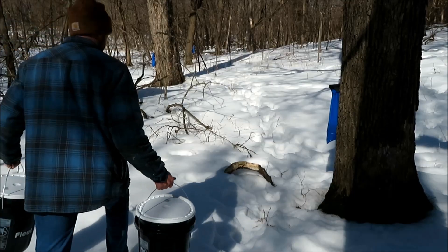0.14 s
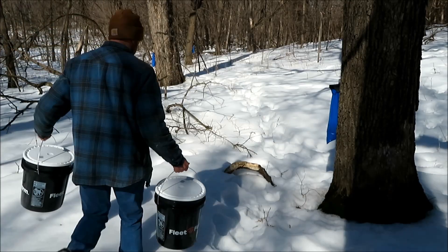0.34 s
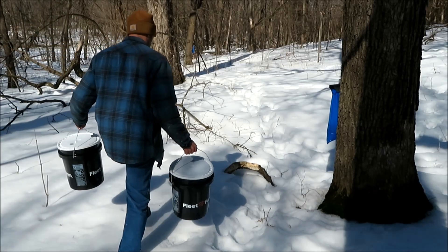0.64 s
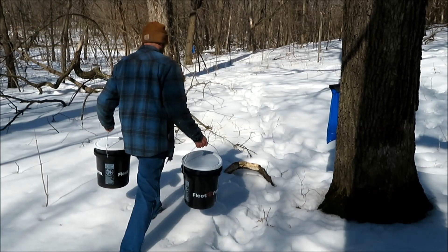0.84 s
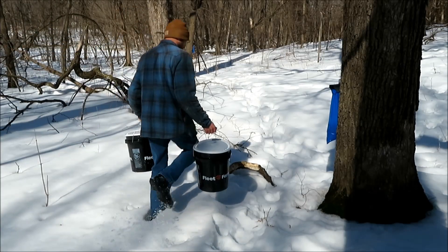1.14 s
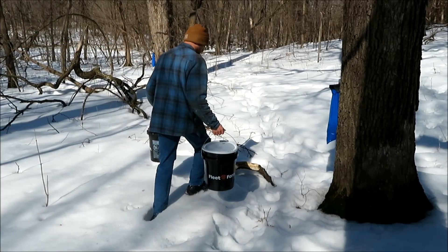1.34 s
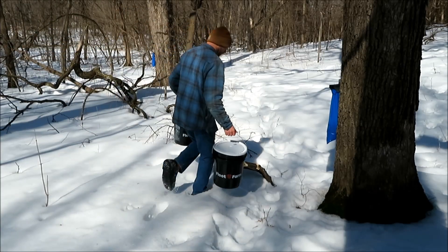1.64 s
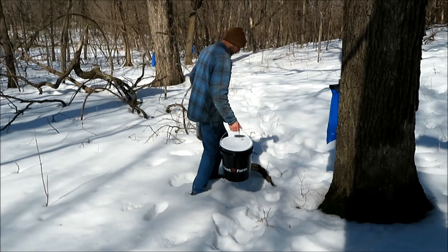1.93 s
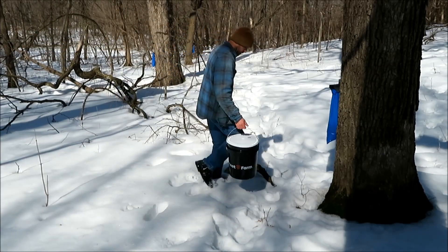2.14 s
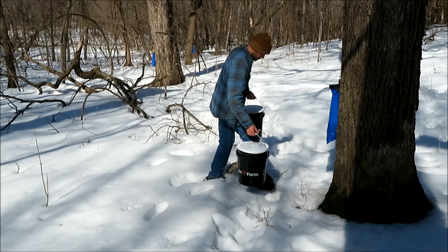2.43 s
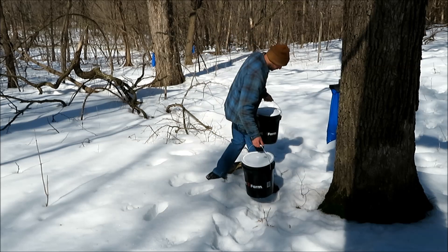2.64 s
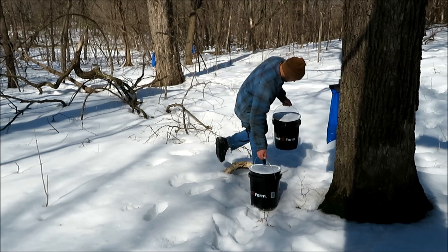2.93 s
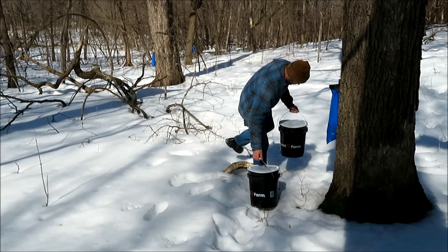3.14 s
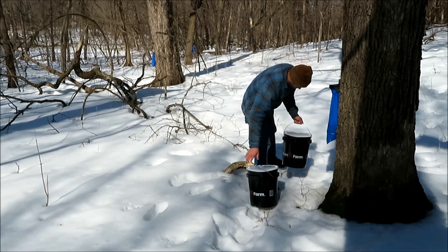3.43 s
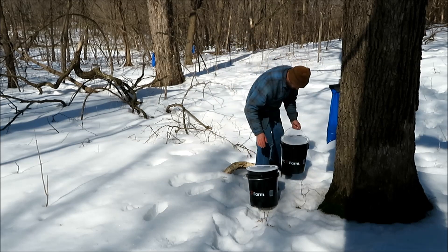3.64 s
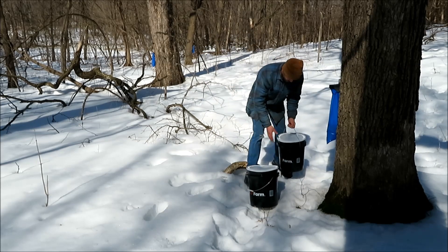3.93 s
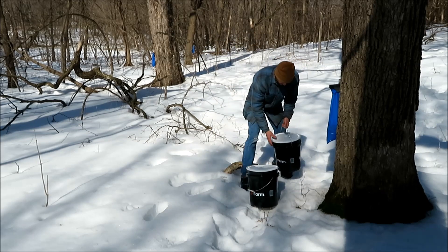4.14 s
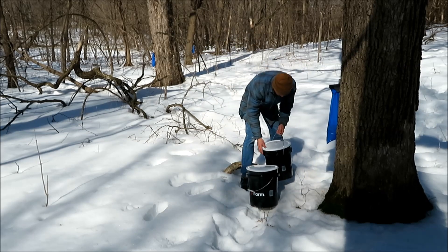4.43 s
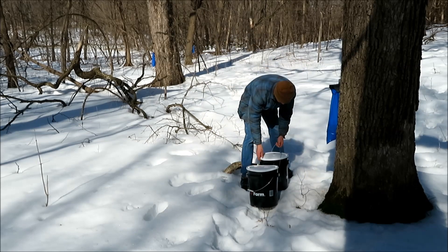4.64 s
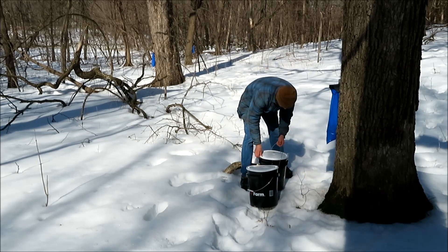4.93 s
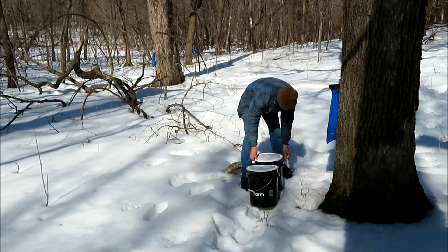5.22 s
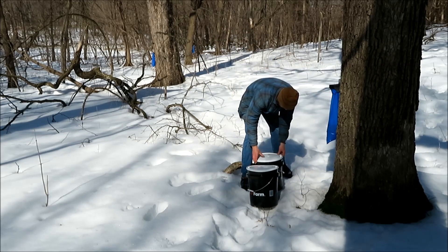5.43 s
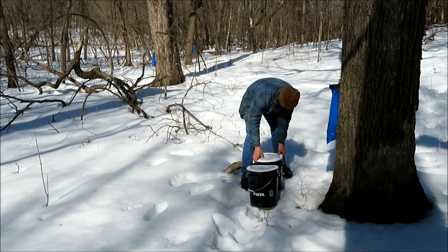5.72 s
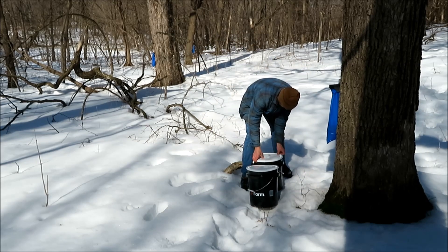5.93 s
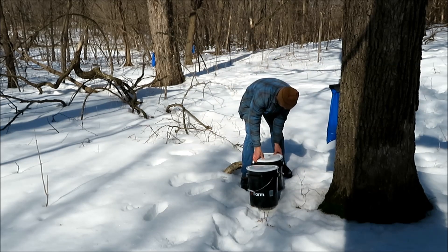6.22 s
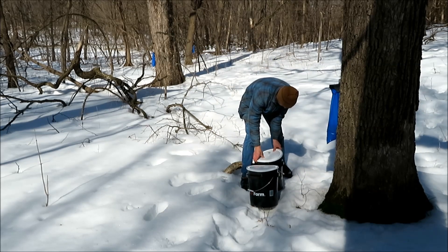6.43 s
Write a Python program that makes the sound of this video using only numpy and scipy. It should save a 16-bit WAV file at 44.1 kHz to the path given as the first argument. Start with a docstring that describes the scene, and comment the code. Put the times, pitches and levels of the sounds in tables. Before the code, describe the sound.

A fixed stereo microphone in open, snowy woods hears a low, unsteady engine idling far off, with faint rustle and hiss throughout. Boots crunch through crusted snow at about 0.1, 0.8, 1.4, 1.9 and 2.5 seconds, the first ones loud and gritty, the last quieter and duller as the walker moves off. Near 3.0 a plastic pail lands with a rough scrape and hollow thud, followed by small rattles until 3.6. At 3.8 comes a sharp handle clack with a snap, then another knock at 4.0 and light rubbing. After a lull, a duller bump and scuff at 4.7 lead to a cluster of quick rattles around 5.1-5.2, and stronger knocks at 5.4 and 5.6. Soft thuds at 5.9 fade into near quiet with small taps. At 6.37 a very loud, dry, bright lid snap bursts out, with a brief plastic rub ending the scene around 6.5.

```python
"""Boots and pails in winter woods

Boots walk away over crusted snow: grains of noise break under each step and their treble narrows.
Two plastic pails are set down; handles and lids rub and knock as noise ringing through wall resonances.
Decaying sines add thuds, clean rings, hard clicks and two snaps of a lid rim.
Far off an idling engine, shaft orders in noise, swells and fades; rustle and hiss lie under it all."""
import sys
import numpy as np
from scipy import signal
from scipy.fft import rfft, irfft, next_fast_len
from scipy.io import wavfile
from scipy.ndimage import uniform_filter1d, map_coordinates

SR = 44100
rng = np.random.default_rng(int(sys.argv[2]) if len(sys.argv) > 2 else 0)


def to_wav(sig):
    """Store sig (one row per channel, or 1-D mono) as 16-bit WAV at the path in sys.argv[1].

    Samples outside -1..1 are clipped; the rate is SR.
    """
    pcm = np.clip(np.atleast_2d(sig), -1, 1) * 32767
    pcm = np.round(pcm).astype(np.int16)
    wavfile.write(sys.argv[1], SR, pcm.T)  # frames by channels


N = 289296

# Boot load on the crust, heel to sole to toe, one list a step: start_s, level_db, dull_db, edge_db
STEP_LOADS = [
    [(.135, -39, 7, -4), (.141, -27.5, -5, -6), (.18, -34, 7.5, -3), (.2, -37, -2, -4), (.225, -49, -9, -2),
     (.236, -38.5, 8, -0.5), (.27, -35.5, 0.5, -1), (.34, -37, 4, -2.5), (.39, -41.5, -4, -3.5),
     (.422, -36.5, 4.5, -9.5), (.445, -47, 5, -4)],
    [(.804, -35, 12, -15), (.807, -29, 8, -8.5), (.83, -37, 6, -0.5), (.885, -43.5, 1, -0.5),
     (.92, -41, 4, -4.5), (.935, -35.5, -2, -5), (.985, -40, -9, -1), (1.005, -40.5, 4, -2),
     (1.025, -38.5, 3, 2), (1.06, -36.5, -3, -3.5), (1.087, -46, 2, -2)],
    [(1.384, -47, -4, 1), (1.394, -29.5, 0, -9.5), (1.425, -29.5, -5, -5), (1.445, -46.5, 2, -3),
     (1.464, -52, 0, -2), (1.47, -48, 7, 3), (1.52, -41, 3, -0.5), (1.575, -38.5, 5.5, -1.5),
     (1.625, -46, -5, -6.5), (1.67, -40, 10.5, -5), (1.695, -51, 12, -1)],
    [(1.94, -45, 8, 0), (1.947, -36.5, 2, -2), (1.975, -37, 9, 1.5), (2.003, -46, -3, 2),
     (2.08, -46, -4, -2), (2.165, -46, 7, -3.5), (2.205, -44, 3, 2), (2.245, -47, 0, -3.5),
     (2.26, -55, 16, 0)],
    [(2.534, -54, 0, -1), (2.54, -35.5, -8, -7.5), (2.562, -49.5, -10, 1.5), (2.59, -42, 4.5, -6.5),
     (2.688, -49.5, -2, -10), (2.705, -64, 5, -8)],
]
# Icy part of each step over its edge part: icy_db
STEP_ICY_DB = [1.3, 0.28, -1.6, -2.3, -2]
# Swinging boot grazes the crust: start_s, length_s, level_db, dull_db, icy_db
GRAZES = [(1.306, 0.029, -49.5, 6, -3), (2.375, 0.057, -47.5, -4, -14)]
# Snow noise spectrum: freq_hz, density_db_per_hz
SNOW_SPECTRUM = [(240, -21), (400, 1.5), (453, 7.5), (949, -3.5), (1130, -6), (1350, -8.5), (1560, -20.5),
                 (1840, -14.5), (2250, -18), (3470, -19.5), (4950, -26), (6050, -21), (13100, -21.5),
                 (16000, -20)]
# Left-right likeness of near snow: freq_hz, likeness
NEAR_LIKENESS = [(300, 1), (1400, 0.98), (3000, 1), (7000, 0.65), (15000, 0.81)]
# Pail rubs, one stroke a row: start_s, level_db, rise_s, hold_s, t60_s, dull_db, icy_db, ring_hz
SCUFFS = [(2.981, -18.5, 0.013, 0.0034, 0.072, -12, -12, 1330),
          (3.032, -43.5, 0.0076, 0.038, 0.62, -3, -17, 1350),
          (3.197, -43.5, 0.02, 0.0036, 0.42, 2, -16, 1350),
          (3.261, -39, 0.016, 0.048, 0.18, 3, -15.5, 1330),
          (3.385, -50, 0.016, 0.017, 0.091, -4, -17, 1350), (3.551, -57, 0.033, 0.033, 1.2, 11, -6, 1750),
          (3.736, -61, .06, 0.026, 0.34, 15, -2, 1700), (3.864, -44, 0.029, 0.018, 0.15, -7, -19, 1300),
          (3.956, -47, 0.013, 0.0024, 0.74, 3, -8, 1270), (4.047, -44, 0.021, 0.0056, 0.13, -9, -25, 1300),
          (4.101, -47.5, 0.026, 0.042, 0.43, 6, -16, 1320),
          (4.742, -31.5, 0.015, 0.021, 0.18, 1, -16.5, 1400),
          (4.825, -55, 0.025, 0.094, 0.53, 5, -24, 1450), (4.927, -49, 0.02, 0.022, 0.11, -9, -10, 1530),
          (5.102, -35, 0.0048, 0.021, 0.13, 1.5, -10.5, 1600),
          (5.147, -34, 0.024, 0.022, 0.15, -1, -17.5, 1280),
          (5.215, -39.5, 0.02, 0.017, 0.077, 7, -22, 980), (5.267, -51, 0.026, .06, 0.24, 2.5, -15, 1430),
          (5.385, -53, 0.041, .004, 0.12, -9, -13, 1450), (5.442, -47, 0.0049, 0.076, 0.13, 7.5, -17, 1600),
          (5.608, -46, 0.0042, 0.026, 0.41, -1, -19, 1340),
          (5.72, -61, 0.017, 0.0028, 1.02, -10, -29, 1268),
          (6.377, -34, 0.0039, 0.0075, 0.091, -1, -27, 3020),
          (6.398, -37.5, 0.0045, 0.019, 0.14, -12, -30, 1970),
          (6.441, -48.5, 0.015, 0.038, 0.28, -24, -32, 2050),
          (6.495, -52.5, 0.012, 0.047, .08, -23, -32, 2380)]
# Pail, handle and lid contacts: start_s, level_db, dull_db, bright_db, ring_hz, hold_s, nominal_t60_s
KNOCKS = [(2.989, -23.5, 3, -5.5, 2230, 0.011, 0.13), (3.023, -33, 3, -9, 1260, 0.0045, 0.076),
          (3.047, -40, -5, -14, 1330, .004, 0.056), (3.081, -42.5, 10.5, -4, 1400, 0.0093, 0.044),
          (3.128, -38.5, 1, -5.5, 1090, 0.0044, 0.08), (3.194, -43, 6, -6, 1420, 0.0031, .04),
          (3.208, -39, -14, -13, 1440, 0.0027, .04), (3.228, -38, -19, -18, 1160, 0.004, .032),
          (3.273, -40, -7, -7, 1210, .004, 0.057), (3.386, -42, 6, -6, 1208, .002, .02),
          (3.392, -36, 0, -2.5, 1220, 0.003, 0.071), (3.524, -50, -17, -12, 1280, 0.0049, 0.065),
          (3.6, -47.5, -6, -7, 750, 0.0049, 0.046), (3.738, -43.5, -5.5, -7, 1930, 0.0044, 0.16),
          (3.76, -46, -8, -9, 1210, 0.011, 0.1), (3.826, -21.5, 0, -9.5, 2330, 0.0046, 0.045),
          (3.829, -24.5, 2.5, -10, 1350, 0.014, 0.14), (3.894, -40.5, -4, -10, 1150, 0.011, 0.051),
          (3.96, -49, 3, -11, 1000, .004, 0.037), (4.0317, -28.5, -8, -9.5, 1370, 0.0065, 0.03),
          (4.039, -40, 6.5, -10, 1320, 0.0068, 0.14), (4.093, -46, 0, -2, 3180, .002, 0.023),
          (4.1013, -35, -9, -7, 1310, 0.0039, 0.1), (4.175, -47.5, 4, -5.5, 2370, 0.0086, 0.059),
          (4.723, -26.5, -3.5, -5, 1650, 0.019, 0.062), (4.959, -46, -20, -2, 1610, 0.005, 0.05),
          (4.995, -49, 4, -4.5, 1130, 0.0026, 0.018), (5.08, -65, 8, -18, 750, 0.0033, 0.049),
          (5.1105, -29.5, -4, -11, 1540, 0.0022, 0.036), (5.114, -32, -1, -13, 1500, .003, 0.06),
          (5.133, -31.5, -1.5, -18, 2300, 0.0044, 0.044), (5.1753, -30, -8, -9, 1230, .003, 0.033),
          (5.187, -29, -9, -14, 1510, 0.0022, 0.048), (5.195, -33, -4, -19, 1700, 0.0018, 0.036),
          (5.245, -41, 6, -16, 2300, 0.0039, .03), (5.164, -36, -7, -12, 1280, 0.0033, 0.044),
          (5.201, -33, -2, -23, 1280, 0.0033, 0.034), (5.268, -40.5, 3, -8, 4300, 0.0038, 0.066),
          (5.329, -54, 3, -18, 1020, .003, .04), (5.347, -42, 4, -7, 1260, 0.0042, 0.091),
          (5.42, -23, 2, -11, 1120, 0.0054, 0.13), (5.476, -37, -4, -8.5, 1210, 0.0038, 0.04),
          (5.495, -41, -6, -10, 1210, .0086, 0.082), (5.504, -44, -5, -20, 1580, .006, .08),
          (5.571, -35, -2, -13, 3820, 0.01, 0.052), (5.5842, -24.5, -3.5, -6.5, 1380, 0.0022, 0.12),
          (5.648, -39.5, -9, -14.5, 1290, 0.012, 0.15), (5.76, -48.5, 5, -15, 896, 0.0033, 0.036),
          (5.815, -57, 11, -12, 907, .004, .05), (5.827, -60, 6, -14, 1580, .008, .06),
          (6.136, -45, 2.5, -7, 1280, 0.013, 0.14), (6.244, -44.5, -7, -8.5, 900, 0.0031, 0.048),
          (6.3689, -13, -12.5, -8, 2940, 0.0013, 0.04), (6.43, -47, -12, -6, 2250, 0.0074, 0.13)]
# Pail wall resonances: freq_hz, width_hz, level_db
PAIL_MODES = [(263, 220, -4.5), (525, 100, 5.5), (794, 180, -1), (933, 33, 9), (1220, 140, 5),
              (1665, 135, 7.5), (1906, 76, 5.5), (2236, 97, 8), (2377, 280, -1.5), (2724, 38, 3.5),
              (3460, 72, -14), (3674, 19, 7), (3960, 56, -7), (4840, 330, 2), (5230, 320, -8)]
# Left-right likeness of the pails: freq_hz, likeness
PAIL_LIKENESS = [(300, 1), (700, 0.98), (1300, .96), (2400, 0.98), (4400, 0.82), (8000, 0.88),
                 (15000, 0.68)]
# Weight landing on the snow: start_s, level_db, pitch_hz
THUDS = [(0.233, -16, 83), (0.806, 2, 690), (.806, -1, 360), (0.808, -18, 88.5), (0.82, -7, 520),
         (1.278, -13, 454), (1.979, -8.5, 145), (3.002, -5.5, 117), (3.126, -13, 104), (4.735, -6.5, 106.6),
         (4.773, -8.5, 101), (4.873, -12.5, 132), (5.065, -13, 400), (5.126, -12, 98), (5.246, -13.5, 90),
         (5.861, -3.5, 124), (5.885, -11.5, 108)]
# Single pail tones left ringing by a blow: start_s, level_db, pitch_hz, t60_s
RINGS = [(3.01, -13.5, 474, 0.15), (3.052, -33, 1340, .06), (3.081, -29, 1390, .05),
         (3.134, -37, 1060, 0.045), (3.197, -35, 1440, .05), (3.208, -32, 1430, .05),
         (3.226, -31, 1430, .06), (3.288, -29, 1230, 0.23), (3.395, -30, 1240, 0.046),
         (3.8262, -21, 12500, 0.0072), (3.3, -28.5, 583, 0.31), (3.527, -41, 1980, 0.045),
         (3.75, -40, 1990, 0.1), (3.835, -15, 732, 0.056), (4.036, -31.5, 1268, 0.32),
         (3.868, -31, 2240, .04), (4.126, -43, 3500, .04), (4.127, -36, 2300, .04),
         (4.147, -38, 2260, 0.053), (4.1043, -24.5, 2320, .03), (4.18, -35, 2300, 0.041),
         (5.433, -21, 231, 0.21), (4.735, -19, 1180, 0.041), (5.12, -36, 1770, 0.1), (5.17, -28, 1270, .1),
         (5.424, -24, 2220, 0.042), (5.445, -45, 2710, 0.3), (5.587, -34, 3980, 0.077),
         (5.651, -32, 1282, 0.094), (6.424, -25, 2250, 0.038), (6.4, -31, 1900, .03),
         (6.412, -38, 1740, .03), (3.332, -40, 2670, 0.057)]
# Lid rim springs: start_s, level_db
SNAPS = [(3.8269, -10), (6.37, 2)]
# Lid tones in each snap: pitch_hz, relative_db, t60_s
LID_MODES = [(313, 0, 0.0088), (520, -12, 0.019), (1157, -11.5, 0.023), (1617, -17, 0.04),
             (2260, -12, 0.028), (2940, -7, 0.0058), (3600, -6.5, 0.0043), (4110, 4, 0.0044),
             (4480, -11, 0.011)]
# Hard edge touches first: start_s, level_db
CLICKS = [(3.1895, -40), (3.207, -35), (3.2325, -36), (3.267, -39), (3.393, -37), (3.8262, -19),
          (3.9575, -38), (3.9925, -36), (4.0329, -19), (4.103, -28), (5.269, -35), (5.4224, -24.5),
          (5.4715, -36), (5.574, -32), (5.5856, -18.5), (6.3697, -11)]
# Edge tones in each click, before scatter: pitch_hz, relative_db, t60_s
EDGE_MODES = [(3070, -1.5, 0.012), (4400, -3.5, 0.013), (6300, -20, 0.0069), (8400, -29, 0.0037),
              (10400, -9.5, .005)]
# Engine noise levels: time_s, rumble_db, drone_db
ENGINE_LEVELS = [(0.0, -34.5, -44.5), (0.47, -35.5, -35.5), (1.33, -35, -37.5), (2.26, -33, -34.5),
                 (3.36, -34, -38), (4.29, -36.5, -40), (5.19, -35.5, -38), (6.56, -34.5, -45.5)]
# Shaft orders, before flutter and fade: multiple, rms_db
SHAFT_ORDERS = [(2, -57.5), (9, -40.5), (11, -43.5), (18, -52.5), (27, -57)]
# Low engine noise spectrum: freq_hz, density_db_per_hz
RUMBLE_SPECTRUM = [(12, -42), (20, -9), (108, -2.5), (124, -0.5), (155, 0.5), (174, 1.5), (231, -5),
                   (253, -7.5), (300, -28), (390, -9), (660, -120)]
# Upper engine noise spectrum: freq_hz, density_db_per_hz
DRONE_SPECTRUM = [(140, -34), (230, -14.5), (305, 6.5), (392, -4.5), (455, 0.5), (560, -10), (638, -38),
                  (782, -36), (1500, -26), (1950, -37), (3300, -120)]
# Narrow top band of the engine: freq_hz, density_db_per_hz
WHINE_SPECTRUM = [(480, -40), (570, -3), (650, 1), (720, -24), (850, -42)]
# Level of that band: time_s, level_db
WHINE_LEVELS = [(0, -58), (.22, -58), (1.2, -46.5), (1.7, -48.5), (2.4, -51.5), (3.2, -48.5), (3.6, -59),
                (4.04, -45), (4.5, -63), (5.39, -61), (6.56, -63)]
# Air noise spectrum: freq_hz, density_db_per_hz
AIR_SPECTRUM = [(350, -5.5), (600, -7.5), (748, -7), (906, -9), (1310, -18), (1610, -17.5), (2910, -21),
                (6640, -33.5), (16000, -43.5)]
# Air levels: time_s, rustle_db, hiss_db
AIR_LEVELS = [(0.0, -44, -62), (0.38, -46, -58), (3.73, -47, -61.5), (3.96, -45, -58), (4.49, -47, -62.5),
              (5.43, -46.5, -62.5), (5.94, -47, -62), (6.56, -49.5, -62.5)]
# Left-right likeness of far sounds: freq_hz, likeness
FAR_LIKENESS = [(60, 1.0), (130, 1.0), (290, 0.995), (640, 0.94), (1410, 0.33), (3100, 0.024),
                (6820, 0.088), (15000, 0.13)]

PART_BORDERS_HZ = [850, 2470, 5270]  # between dull, body, edge and icy parts

# Likeness of the steps at 7 and 15 kHz: far value, loss at time 0, time constant of leaving
FAR_7K, FAR_15K, LOSS_7K, LOSS_15K, LEAVE_S = 0.92, 0.68, 0.64, 1.9, 0.84
ICY_SAG_DB_PER_S = 19  # within a step
CRUST_BREAKS_PER_S, PAIL_SLIPS_PER_S, BREAK_DECAY_S = 400, 520, 0.00033
TREBLE_KNOTS_PER_S, TREBLE_WOBBLE_DB = 110, 1.3  # clumps of crust give way together
GRAZE_HZ, GRAZE_WIDTH_HZ, GRAZE_PEAK_DB, GRAZE_EDGE_DB = 3100, 1200, 7, 2

SCUFF_EDGE_DB, SCUFF_FAVOUR_DB = -7.5, 8
TOUCH_RING_DB, TOUCH_WIDTH_HZ = -3, 55  # tone of the spot touched
RISE_PER_HOLD, LONGEST_RISE_S = 0.073, 0.0009
KNOCK_ICY_DB, ICY_DB_PER_BRIGHT_DB, ICY_HOLD_SHARE = 2, 2.2, 0.76
KNOCK_LEFT_OVER_RIGHT_DB = -0.9

THUD_T60_CYCLES = 7.14
LEFT_LAG_S = 0.000018  # pails stand a little nearer the right side
RING_FLUTTER_DB = 2.5  # above 1500 Hz

SHAFT_HZ = 16.74  # mean speed
BAND_LIMIT_HZ = 15800


def boots():
    """Crust breaks under each step's load; the treble narrows as the walker leaves."""
    out = 0
    for rows, icy_over_edge_db in zip(STEP_LOADS, STEP_ICY_DB):
        times, *columns = np.transpose(rows)
        start_s = times[0]
        t = clock(start_s, times[-1] - start_s)
        level_db, dull_db, edge_db = [np.interp(start_s + t, times, c) for c in columns]
        edge_db = edge_db + TREBLE_WOBBLE_DB * wobble(TREBLE_KNOTS_PER_S, len(t))
        icy_db = edge_db + icy_over_edge_db - ICY_SAG_DB_PER_S * t
        gain = amp(level_db + 0.37 * wobble(45.6, len(t)))
        cracks = breaks(len(t), CRUST_BREAKS_PER_S, depth=0.097)
        out = out + crunch(start_s, gain, snow, step_likeness(start_s), dull_db, edge_db, icy_db,
                           cracks, patch_db=2.5)
    for start_s, length_s, level_db, dull_db, icy_db in GRAZES:
        size = len(clock(start_s, length_s))
        gain = amp(level_db) * np.sqrt(np.hanning(size) + 0.17)
        cracks = breaks(size, CRUST_BREAKS_PER_S, depth=0.3)
        out = out + crunch(start_s, gain, grazed_snow, step_likeness(start_s), dull_db, GRAZE_EDGE_DB,
                           icy_db, cracks, patch_db=5)
    return out


def snow(hz):
    """Amplitude spectrum of breaking crust."""
    return amp(along(SNOW_SPECTRUM, hz))


def grazed_snow(hz):
    """Snow spectrum lifted by the broad tone of a graze."""
    return snow(hz) * amp(GRAZE_PEAK_DB * np.exp(-((hz - GRAZE_HZ) / GRAZE_WIDTH_HZ) ** 2))


def step_likeness(start_s):
    """Left-right likeness of a step; its treble grows alike with distance."""
    near = np.exp(-start_s / LEAVE_S)
    return NEAR_LIKENESS[:3] + [(7000, FAR_7K - LOSS_7K * near), (15000, FAR_15K - LOSS_15K * near)]


def scuffs():
    """Rubbing slips in uneven jerks that ring the pail wall."""
    out = 0
    for start_s, level_db, rise_s, hold_s, t60_s, dull_db, icy_db, ring_hz in SCUFFS:
        t = clock(start_s, rise_s + hold_s + t60_s / 2)
        gain = amp(level_db) * swell(t, rise_s, hold_s, t60_s)
        slips = breaks(len(t), PAIL_SLIPS_PER_S, depth=0.41)
        out = out + crunch(start_s, gain, lambda hz: pail(hz, ring_hz, SCUFF_FAVOUR_DB), PAIL_LIKENESS,
                           dull_db, SCUFF_EDGE_DB, icy_db, slips, patch_db=0.0)
    return out


def knocks():
    """Each contact is a rattle burst that swells, holds and dies in the pail; the treble dies first."""
    t60_shares = [1.16, 0.41, 0.38, 0.19]  # dull, body, edge, icy
    hold_shares = [1, 1, 1, ICY_HOLD_SHARE]
    t, out = np.arange(SR // 6) / SR, np.zeros((2, N + SR))
    pan = sides(KNOCK_LEFT_OVER_RIGHT_DB)[:, None]
    for start_s, level_db, dull_db, bright_db, ring_hz, hold_s, t60_s in KNOCKS:
        rise_s = min(RISE_PER_HOLD * hold_s, LONGEST_RISE_S)
        # drive and damping each carry half of the decay
        drive = np.clip(t / rise_s, 0, 1) * amp(-30 * np.clip(t - rise_s - hold_s, 0, None) / t60_s)
        ring = pair(lambda hz: pail(hz, ring_hz, favour_db=6.0, scatter_db=1.6), PAIL_LIKENESS,
                    grain_db=2.5, envelope=drive)
        levels_db = [dull_db, 0, bright_db, KNOCK_ICY_DB + ICY_DB_PER_BRIGHT_DB * bright_db]
        bands = parts(ring, PART_BORDERS_HZ)
        for band, band_db, t60_share, hold_share in zip(bands, levels_db, t60_shares, hold_shares):
            after_s = np.clip(t - rise_s - hold_share * hold_s, 0, None)
            damping = amp(-30 * after_s / (t60_s * t60_share))
            burst_rms = np.sqrt(np.mean((drive * damping) ** 2))
            band = unit(band * damping) * burst_rms
            out[:, round(start_s * SR):][:, :len(t)] += pan * amp(level_db + band_db) * band
    return out[:, :N]


def struck_tones():
    """Thuds, rings, snaps and clicks: decaying sines; the lower the tone, the slower its start."""
    t, out = np.arange(SR // 2) / SR, np.zeros((2, N + SR))
    lag_s = np.array([[LEFT_LAG_S], [0]])
    tones = [(start_s, db, hz, THUD_T60_CYCLES / hz) for start_s, db, hz in THUDS]
    tones += list(RINGS)
    tones += [(start_s, db + mode_db, hz, t60_s) for start_s, db in SNAPS for hz, mode_db, t60_s in LID_MODES]
    for start_s, db in CLICKS:
        for hz, mode_db, t60_s in EDGE_MODES:
            tones.append((start_s, db + mode_db + rng.normal(0, 1.5), hz * rng.normal(1, .03), t60_s))
    for start_s, db, hz, t60_s in tones:
        flutter_db = (hz > 1500) * RING_FLUTTER_DB * np.clip(t / .01, 0, 1) * wobble(200, len(t))
        onset = 1 - np.exp(-t * hz / 0.85)
        gain = amp(db - 60 * t / t60_s + flutter_db) * onset
        out[:, round(start_s * SR):][:, :len(t)] -= gain * np.sin(2 * np.pi * hz * (t - lag_s))
    return out[:, :N]


def engine():
    """Unsteady shaft orders in low noise; upper orders follow the drone as it swells and fades."""
    rumble_db, drone_db = curves(ENGINE_LEVELS)
    turns = np.cumsum(SHAFT_HZ * (1 + 0.00848 * wobble(6))) / SR
    fade_db = drone_db - np.mean(drone_db)
    orders = 0
    for k, rms_db in SHAFT_ORDERS:
        gain = amp(rms_db + 4.5 * np.tanh(wobble(15)) + (k > 12) * fade_db) * np.sqrt(2)
        orders = orders + gain * np.sin(2 * np.pi * (k * turns + .13 * wobble(9)))
    rumble = amp(rumble_db + 1.5 * wobble(4.075)) * far_noise(RUMBLE_SPECTRUM)
    drone = amp(drone_db + 1.2 * wobble(3.82)) * far_noise(DRONE_SPECTRUM)
    whine = amp(curves(WHINE_LEVELS)[0] + 1.6 * wobble(8.5)) * far_noise(WHINE_SPECTRUM)
    return orders + rumble + drone + whine


def air():
    """Faint rustle of clothes and woods under a smooth hiss, nearly unrelated between the sides."""
    rustle_db, hiss_db = curves(AIR_LEVELS)
    rustle, hiss = parts(far_noise(AIR_SPECTRUM), [4000])
    return amp(rustle_db + 0.65 * wobble(22)) * rustle + amp(hiss_db + 1.0 * wobble(5.32)) * hiss


def woods(x, t60_s, wet_db):
    """Trunks scatter a short dull tail."""
    t = np.arange(SR // 3) / SR
    decay = amp(-60 * t / t60_s) * (t > .006)
    tail = unit(rng.standard_normal((2, len(t))) * decay) / np.sqrt(len(t))
    wet = signal.fftconvolve(x.mean(0)[None], tail, axes=1)[:, :N]
    return x + amp(wet_db) * filtered(wet, lambda hz: 1 / (1 + 1j * hz / 4000))


def crunch(start_s, gain, spectrum, likeness, dull_db, edge_db, icy_db, cracks, patch_db):
    """Dense breaking grains in shifting colour, summed from dull, body, edge and icy parts."""
    t = np.arange(len(gain)) / SR
    grains = patchy(pair(spectrum, likeness, envelope=cracks), patch_db)
    dull, body, edge, icy = parts(grains, PART_BORDERS_HZ)
    ends = np.clip(np.minimum(t / 0.00044, (t[-1] - t) / 0.005), 0, 1)
    mix = amp(dull_db) * dull + body + amp(edge_db) * edge + amp(icy_db) * icy
    out = np.zeros((2, N))
    out[:, round(start_s * SR):][:, :len(t)] = ends * gain * mix
    return out


def pail(hz, ring_hz=1200, favour_db=0, scatter_db=0):
    """Plastic wall resonances over a broad rasp; modes near ring_hz are favoured, the spot rings there."""
    mode_hz, width_hz, db = np.transpose(PAIL_MODES)[..., None]
    db = db + favour_db * np.exp(-(np.log(mode_hz / ring_hz) / .17) ** 2)
    db = db + scatter_db * rng.standard_normal(mode_hz.shape)
    sign = (-1) ** np.arange(len(mode_hz))[:, None]
    modes = sign * amp(db) * resonance(hz, mode_hz, width_hz)
    touched = amp(TOUCH_RING_DB) * resonance(hz, ring_hz, TOUCH_WIDTH_HZ)
    rasp = amp(-4.0) * hz / (hz + 400) / (1 + 1j * hz / 9000)
    return modes.sum(axis=0) + touched + rasp


def resonance(hz, center_hz, width_hz):
    """Complex response of one damped mode, peak 1."""
    return 1j * hz * width_hz / (center_hz ** 2 - hz * hz + 1j * hz * width_hz)


def breaks(size, rate_per_s, depth):
    """Gain that jumps at random moments and dies at once: single cracks above the dense grain."""
    jumps = (rng.random(size) < rate_per_s / SR) * rng.exponential(size=size)
    return 1 + depth * signal.lfilter([1], [1, -np.exp(-1 / (BREAK_DECAY_S * SR))], jumps)


def patchy(x, depth_db):
    """Random gain in small patches of time and frequency: the colour keeps shifting."""
    z = signal.stft(x, nperseg=256)[2]
    field = uniform_filter1d(rng.standard_normal(z.shape[1:]), size=3, axis=0)
    field = uniform_filter1d(field, size=5, axis=1)
    return signal.istft(z * amp(depth_db * unit(field)), nperseg=256)[1][:, :x.shape[1]]


def swell(t, rise_s, hold_s, t60_s):
    """Gain that swells from t = 0, holds and dies."""
    return np.clip(t / rise_s, 0, 1) ** 0.65 * amp(-60 * np.clip(t - rise_s - hold_s, 0, None) / t60_s)


def far_noise(spectrum):
    """Stereo noise of rms 1 with a far sound's likeness."""
    return pair(lambda hz: amp(along(spectrum, hz)), FAR_LIKENESS)


def pair(spectrum, likeness, grain_db=0, envelope=np.ones(N)):
    """Stereo noise of rms 1; both sides share grains of log-normal size."""
    size = len(envelope)
    grains = envelope * amp(grain_db * wobble(882, size)) * rng.standard_normal((2, size))

    def mid_side(hz):
        """Mid and side responses that give the wanted likeness."""
        angle = np.arccos(np.clip(along(likeness, hz), -1, .9998)) / 2
        return spectrum(hz) * np.array([np.cos(angle), np.sin(angle)])

    mid, side = filtered(grains, mid_side)
    return unit(np.array([mid + side, mid - side]))


def parts(x, borders_hz):
    """x split at the border frequencies, each part of rms 1."""
    below = [lambda hz: 0] + [lambda hz, c=c: 1 / (1 + (hz / c) ** 6) for c in borders_hz] + [lambda hz: 1]
    return [unit(filtered(x, lambda hz: hi(hz) - lo(hz))) for lo, hi in zip(below, below[1:])]


def filtered(x, response):
    """x times a complex response of frequency."""
    size = x.shape[-1]
    m = next_fast_len(size + 8192)
    return irfft(rfft(x, m) * response(np.fft.rfftfreq(m, 1 / SR)), m)[..., :size]


def wobble(knots_per_s, size=N):
    """Smooth random curve through normal knots."""
    knots = rng.standard_normal(int(size * knots_per_s / SR) + 4)
    return map_coordinates(knots, [np.arange(size) * knots_per_s / SR])


def curves(rows):
    """One value per sample for each column after the time."""
    times, *columns = np.transpose(rows)
    return np.array([np.interp(np.arange(N) / SR, times, c) for c in columns])


def along(points, hz):
    """Values of (freq_hz, value) points on a log axis."""
    f, v = np.transpose(points)
    return np.interp(np.log(hz + 1), np.log(f + 1), v)


def clock(start_s, length_s):
    """Seconds since start_s, for length_s or to the end of the scene."""
    return np.arange(min(round(length_s * SR), N - round(start_s * SR))) / SR


def sides(left_over_right_db):
    """Left and right gains."""
    return amp(np.array([left_over_right_db / 2, -left_over_right_db / 2]))


def amp(db):
    """Decibels to gain."""
    return 10 ** (np.asarray(db) / 20)


def unit(x):
    """x scaled to rms 1."""
    return x / np.sqrt(np.mean(x ** 2) + 1e-20)


def scene():
    """Near noises with the woods' tail, dry struck tones, far background."""
    near = woods(boots() + scuffs() + knocks(), t60_s=0.088, wet_db=-27.0)
    return near + struck_tones() + engine() + air()


def record(dry):
    """Loudest peaks squeezed, the very top drooping, nothing kept above the band limit."""
    squeezed = dry / (1 + np.abs(dry / .93) ** 8) ** (1 / 8)
    return filtered(squeezed, lambda hz: (hz < BAND_LIMIT_HZ) / np.sqrt(1 + (hz / 14500) ** 14))


dry = scene()
out = record(dry)
to_wav(out)
```